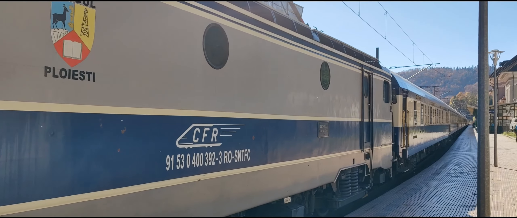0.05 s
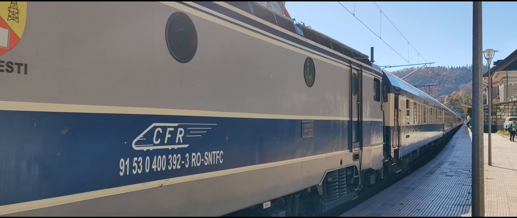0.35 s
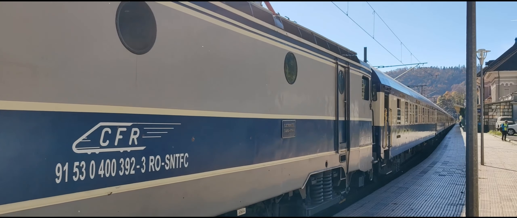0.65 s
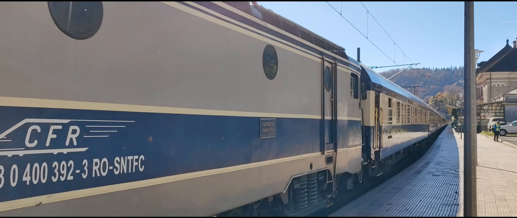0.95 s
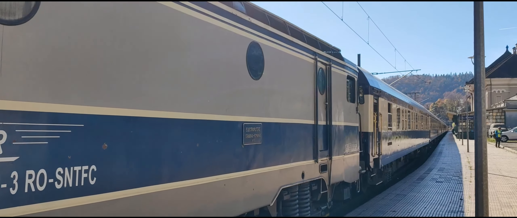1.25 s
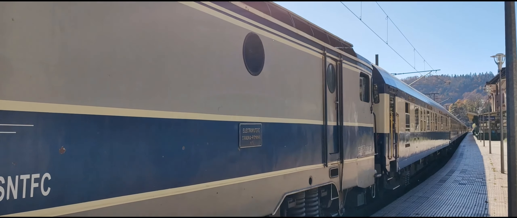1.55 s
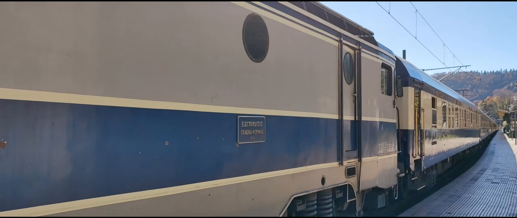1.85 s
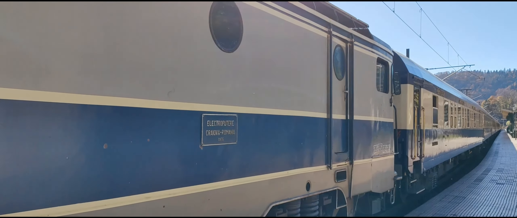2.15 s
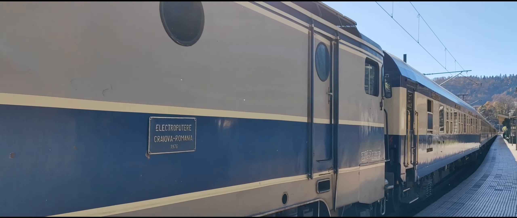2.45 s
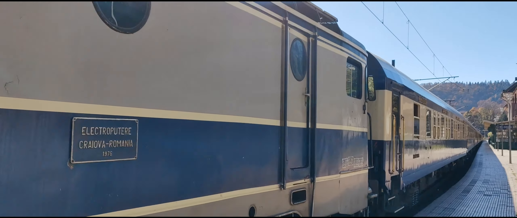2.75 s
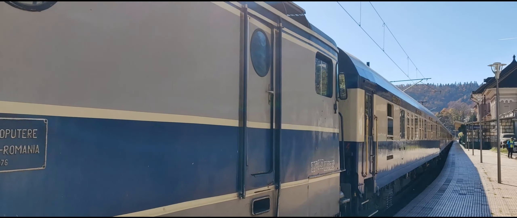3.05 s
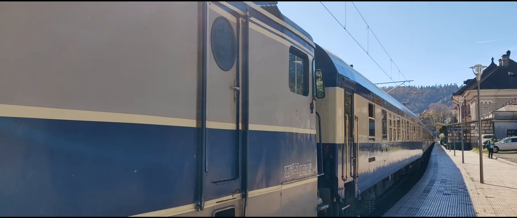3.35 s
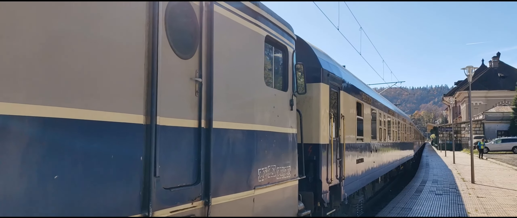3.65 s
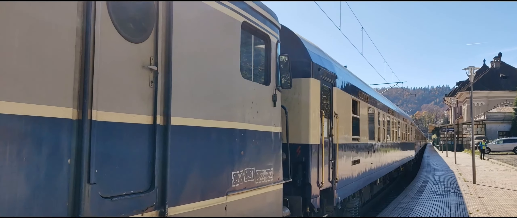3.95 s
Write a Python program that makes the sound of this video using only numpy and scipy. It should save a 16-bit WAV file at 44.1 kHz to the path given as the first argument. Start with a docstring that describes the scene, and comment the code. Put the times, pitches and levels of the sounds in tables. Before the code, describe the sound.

A train passes close by with a humming rush of air that fades into wheel rumble.

```python
"""Cooling blowers boom, hum and rush at close range: an electric locomotive rolls slowly along a station
platform, an arm's length to the left of a spaced pair of microphones. Turbulent air rings its ducts, the
fan blades give the hum, and the rush from the outlets fades and swings ahead as they move off.
That leaves the duller roar of the running gear and coaches, and the hiss of approaching wheels."""
import sys
import numpy as np
from scipy import signal
from scipy.fft import rfft, irfft
from scipy.io import wavfile
from scipy.ndimage import uniform_filter1d

SR = 44100
rng = np.random.default_rng(int(sys.argv[2]) if len(sys.argv) > 2 else 0)


def pcm_store(signal):
    """Save signal as 16-bit PCM."""
    levels = np.round(np.clip(np.atleast_2d(signal), -1, 1) * 32767)
    wavfile.write(sys.argv[1], SR, levels.astype(np.int16).T)


N = 176400
FRAME, HOP = 1024, 256  # samples
TIME = np.arange(N) / SR
FRAME_S, BIN_HZ = np.arange(N // HOP + 5) * HOP / SR, np.fft.rfftfreq(FRAME, 1 / SR)
PADDED_HZ = np.fft.rfftfreq(2 * N, 1 / SR)

# surges of the duct boom (time [s], relative level [dB])
BOOM_LEVEL = [(0, -16.5), (.12, -17.5), (.29, -17), (.39, -17), (.49, -21.5), (.6, -15), (.74, -18.5),
              (.85, -12.5), (.97, -17.5), (1.03, -13), (1.1, -14), (1.2, -14.5), (1.29, -18), (1.45, -16),
              (1.53, -19.5), (1.71, -14.5), (1.77, -18.5), (1.88, -15), (1.96, -21), (2.17, -19),
              (2.32, -26.5), (2.5, -24.5), (2.8, -27), (3.3, -29.5), (4, -30.5)]
# spectrum of the boom (frequency [Hz], relative level [dB])
BOOM_SPECTRUM = [(30, -97), (60, -57.5), (88, -53.5), (102, -42), (135, -38), (164, -27), (188, -40),
                 (240, -50), (295, -40.5), (350, -57.5), (450, -50), (700, -64), (1500, -100), (5000, -160)]
# the ducts pass on the left (time [s], left minus right [dB])
DUCT_BALANCE = [(0, 1), (.6, -0.5), (1.05, 3.5), (1.8, 2.5), (2.35, 4.5), (2.8, 3.5), (3.2, -0.5), (4, 0)]
# blade tone of the blowers (time [s], level [dB])
HUM_LEVEL = [(0, -21), (.4, -21), (.95, -22.5), (1.25, -20), (1.8, -16.5), (2.1, -21), (2.35, -25.5),
             (2.7, -23), (3, -28), (3.2, -27.5), (3.6, -29.5), (4, -28.5)]
# its harmonics (multiple [1], gain [dB])
HUM_HARMONICS = [(1, 1), (2, -24.5), (3, -21.5)]
# air from the outlets, moving off (time [s], gain [dB])
RUSH_FADE = [(0, 2.5), (.5, -0.5), (1, -5.5), (1.5, -9.5), (2, -13), (2.5, -25.5), (4, -60)]
# spectrum of the rush (frequency [Hz], level [dB/Hz])
RUSH_SPECTRUM = [(30, -100.5), (100, -81), (280, -52.5), (400, -56.5), (500, -56.5), (600, -49.5),
                 (800, -53), (1000, -54), (1300, -60), (1500, -66), (1750, -64), (2200, -67), (2650, -66.5),
                 (2950, -70.5), (3700, -72.5), (5500, -77), (8200, -81.5), (10000, -88), (13000, -96),
                 (15000, -103)]
# outlet sound that reaches the microphones directly (frequency [Hz], power share [0-1])
RUSH_DIRECT_SHARE = [(200, 0.51), (500, 0.73), (1100, 0.83), (2500, 0.7), (4000, 0.22), (6000, 0),
                     (9000, 0.1), (14000, 0.2)]
# peaks and troughs that climb as the angle to the outlets changes
# (start [Hz], climb [Hz/s], width [Hz], gain [dB], gone by [s])
RUSH_SWEEPS = [(664, 190, 82, -7.5, 1.26), (750, 120, 58, 3.5, 1.1), (1476, 74, 130, -12.5, 1.4),
               (1494, 460, 220, 7.5, 2.0), (2870, 340, 230, -13, 1.3)]
# resonances of the outlets (frequency [Hz], width [Hz], gain [dB])
OUTLET_MODES = [(1120, 70, 5), (1173, 97, 7), (1258, 100, 4), (1610, 100, 2), (1865, 80, 3.5),
                (1960, 83, 3.5), (2200, 93, 4), (2325, 110, 6), (2476, 80, 9)]
# hollow drone of the nearest outlet (time [s], gain [dB])
DRONE_GAIN = [(0, 3), (.35, -1.5), (.8, 1.5), (1, -2.5), (1.35, -11), (1.47, -14.5), (2.1, -6.5),
              (2.4, -33), (4, -36)]
# spectrum of the drone (frequency [Hz], level [dB/Hz])
DRONE_SPECTRUM = [(100, -115), (200, -70), (250, -67), (275, -42), (303, -41), (340, -50), (450, -81),
                  (1500, -150)]
# roar of the running gear (time [s], gain [dB])
ROAR_GAIN = [(0, 0), (1.5, 0), (2.3, 1.1), (2.7, 1.2), (3.65, 1.2), (4, 0)]
# spectrum of the roar (frequency [Hz], level [dB/Hz])
ROAR_SPECTRUM = [(10, -110), (25, -84), (50, -74.5), (64, -64.5), (76, -50), (86, -56), (100, -50),
                 (135, -58.5), (190, -48), (250, -51), (320, -50.5), (385, -50.5), (450, -54.5),
                 (505, -59.5), (600, -58), (790, -61.5), (890, -62.5), (1300, -65), (1600, -69),
                 (2000, -69), (3000, -81.5), (3900, -82.5), (5000, -88.5), (8000, -96), (10000, -103.5),
                 (12000, -114), (15000, -127)]
# hiss of the approaching wheels (time [s], gain [dB])
HISS_GAIN = [(0, -3), (2.8, -14), (3.3, -5.5), (3.7, -0.5), (4, -0.5)]
# spectrum of the hiss (frequency [Hz], level [dB/Hz])
HISS_SPECTRUM = [(400, -67), (1400, -71.5), (2500, -77), (4000, -89.5), (8000, -93.5), (10000, -102),
                 (13000, -109), (15000, -118)]
# wheel sound that reaches the microphones directly (frequency [Hz], power share [0-1])
WHEEL_DIRECT_SHARE = [(200, 0.38), (500, 0.69), (1100, 0.64), (2500, 0.43), (4000, 0.48), (8000, .08)]
# faint whines of the auxiliary machines (frequency [Hz], relative level [dB])
WHINE_TONES = [(324, -39), (1160, -41), (1330, -45.5), (1631, -36.5)]
# peaks and troughs of the gap between train and platform (frequency [Hz], width [Hz], gain [dB])
GAP_MODES = [(603, 27, 0.5), (768, 43, 2), (1165, 48, 1), (1337, 43, 4.5), (2000, 96, 0), (2070, 74, -1)]
# bearing of the train (time [s], lead of the left microphone in the treble [ms])
LEFT_LEAD = [(0, 0.51), (1, 0.5), (2.3, 0.45), (3, 0.34), (4, 0.33)]
# the low midrange comes from further ahead; bass and treble stay to the left
# (frequency [Hz], share of that lead [0-1])
LEAD_BY_BAND = [(300, 0.93), (450, 0.72), (620, 0.68), (1000, 0.77), (2000, 1)]
# balance between the microphones (frequency [Hz], left minus right [dB])
BAND_BALANCE = [(80, 2.5), (200, 2.5), (280, 5), (360, 1.5), (500, 7.5), (700, 1), (1100, 2.2),
                (1450, -1.5), (2600, -0.5), (4500, .5), (8500, .5), (10500, 2.5), (13000, 1.5)]


def duct_boom(smooth_s=0.06, trim_db=-1.5):
    """Turbulent air rings the low resonance of the ducts in surges, close on the left."""
    boom = station_noise(BOOM_SPECTRUM, gain_db=0, direct=0.28)
    window = int(smooth_s * SR)
    power = uniform_filter1d(uniform_filter1d((boom ** 2).mean(0), window), window)
    surges = amp(trim_db + curve(BOOM_LEVEL, TIME))
    return boom / np.sqrt(power) * surges * pan(curve(DUCT_BALANCE, TIME))


def blower_hum(blade_hz=196.7, doppler_hz=1.7, waver_hz=0.45, flutter_db=1.6, lead_ms=0.13):
    """The blade tone flutters in the air stream and takes a slight Doppler fall as the blowers pass."""
    receding = np.clip((TIME - 1.5) / (2.6 - 1.5), 0, 1)
    cycles = np.cumsum(blade_hz - doppler_hz * receding + waver_hz * wander(7.5)) / SR
    phase = 2 * np.pi * np.array([cycles, cycles - blade_hz * lead_ms / 1000])
    tone = sum(amp(db + flutter_db * wander(18)) * np.sin(round(k) * phase) for k, db in HUM_HARMONICS)
    balance_db = 1.84 * curve(DUCT_BALANCE, TIME)  # swings wider than the boom
    return np.sqrt(2) * tone * amp(curve(HUM_LEVEL, TIME)) * pan(balance_db)


def air_rush(beaming=0.13, sweep_fade_s=0.34, whistle_db=5):
    """Cooling air rushes through resonant outlets; the treble fades first as they move off."""
    t = FRAME_S[:, None]
    fade = curve(RUSH_FADE, t) * (1 + beaming * BIN_HZ / 10000)
    sweeps = sum(db * bell(BIN_HZ, hz + climb * t, width) * np.clip((end - t) / sweep_fade_s, 0, 1)
                 for hz, climb, width, db, end in RUSH_SWEEPS)
    # a second outlet whistles as it passes the microphones
    passing = np.exp(-((t - 1.75) / 0.3) ** 2)
    whistle = whistle_db * bell(BIN_HZ, centre_hz=1330, width_hz=200) * passing
    gain_db = fade + sweeps + whistle + eddies(patch_db=1.8)
    rush = station_noise(RUSH_SPECTRUM, gain_db, across(RUSH_DIRECT_SHARE, BIN_HZ))
    return resonate(rush, OUTLET_MODES)


def outlet_drone():
    """A higher duct resonance, heard while the nearest outlet is close to the microphones."""
    gain_db = curve(DRONE_GAIN, FRAME_S[:, None])
    return station_noise(DRONE_SPECTRUM, gain_db, across(RUSH_DIRECT_SHARE, BIN_HZ))


def running_gear(patch_db=1.7):
    """Wheels on the rails beside the platform: a steady roar, and a hiss that grows as they near."""
    t = FRAME_S[:, None]
    direct = across(WHEEL_DIRECT_SHARE, BIN_HZ)
    roar = station_noise(ROAR_SPECTRUM, curve(ROAR_GAIN, t) + eddies(patch_db), direct)
    hiss = station_noise(HISS_SPECTRUM, curve(HISS_GAIN, t) + eddies(patch_db), direct)
    return roar + hiss


def auxiliary_whines(waver=0.0045, flutter_db=3, fade_ratio=1.6):
    """Thin unsteady tones of the auxiliary machines, far back in the sound, recede with the outlets."""
    whines = np.zeros((2, N))
    lag_s = curve(LEFT_LEAD, TIME) / 1000
    for hz, db in WHINE_TONES:
        cycles = np.cumsum(hz * (1 + waver * wander(20))) / SR
        phase = 2 * np.pi * np.array([cycles, cycles - hz * lag_s])
        whines += amp(db + flutter_db * wander(9)) * np.sin(phase)
    return whines * amp(fade_ratio * curve(RUSH_FADE, TIME))


def station_noise(spectrum, gain_db, direct, spacing_ms=0.61):
    """Noise at the pair: a direct share reaches the left first, the rest is scattered by the station."""
    shape = (3, len(FRAME_S), len(BIN_HZ))
    source, diffuse, separate = rng.standard_normal(shape) + 1j * rng.standard_normal(shape)
    lag_s = across(LEAD_BY_BAND, BIN_HZ) * curve(LEFT_LEAD, FRAME_S[:, None]) / 1000
    straight = np.array([source, source * np.exp(-2j * np.pi * BIN_HZ * lag_s)])
    # scattered sound is alike at both microphones only in the bass
    coherence = np.sinc(2 * BIN_HZ * spacing_ms / 1000)
    scattered = np.array([diffuse, coherence * diffuse + np.sqrt(1 - coherence ** 2) * separate])
    frames = (np.sqrt(direct) * straight + np.sqrt(1 - direct) * scattered) * amp(gain_db)
    noise = signal.istft(frames, nperseg=FRAME, noverlap=FRAME - HOP, time_axis=1, freq_axis=2)[1]
    colour = amp(across(spectrum, np.fft.rfftfreq(noise.shape[1], 1 / SR)))
    return irfft(rfft(noise) * colour)[:, :N] * np.sqrt(1.5 * SR / FRAME)


def eddies(patch_db, flicker_db=0.22, frames=16, bins=4):
    """Turbulence in dB: small random patches of colour and a slight flicker shared by all bands."""
    patches = rng.standard_normal((len(FRAME_S), len(BIN_HZ)))
    patches = uniform_filter1d(uniform_filter1d(patches, frames, axis=0), bins, axis=1)
    return patch_db * patches / patches.std() + flicker_db * wander(30, FRAME_S)[:, None]


def resonate(sound, modes):
    """Colours a sound with narrow, stationary peaks and troughs."""
    peaks_db = sum(db * bell(PADDED_HZ, hz, width) for hz, width, db in modes)
    return equalise(sound, amp(peaks_db))


def equalise(sound, gains):
    """Applies one gain for each frequency of PADDED_HZ."""
    return irfft(rfft(sound, 2 * N) * gains)[:, :N]


def pan(balance_db):
    """Left and right gains for a level difference, at constant power."""
    gains = amp(np.array([balance_db, -balance_db]) / 2)
    return gains / np.sqrt((gains ** 2).mean(0))


def wander(top_hz, t=TIME):
    """Random drift of unit size, spread over the decade below top_hz."""
    hz = top_hz * np.geomspace(0.1, 1, num=20)
    drift = np.sin(2 * np.pi * (hz[:, None] * t + rng.random((len(hz), 1)))).sum(0)
    return drift / np.sqrt(len(hz) / 2)


def bell(hz, centre_hz, width_hz):
    """Bell-shaped peak of height 1."""
    return np.exp(-2 * ((hz - centre_hz) / width_hz) ** 2)


def curve(table, t):
    """A table read at times t."""
    return np.interp(t, *np.transpose(table))


def across(table, hz):
    """A table read on a log-frequency axis."""
    table_hz, values = np.transpose(table)
    return np.interp(np.log(hz + 1), np.log(table_hz), values)


def amp(db):
    """Decibels to gain."""
    return 10 ** (np.asarray(db) / 20)


def scene():
    """The train from the platform edge: the gap colours rush and wheels, and most bands lean left."""
    blowers = blower_hum() + duct_boom()
    through_gap = resonate(air_rush() + running_gear(), GAP_MODES)
    train_side = through_gap + outlet_drone() + auxiliary_whines()
    return blowers + equalise(train_side, pan(across(BAND_BALANCE, PADDED_HZ)))


def record(dry):
    """The recorder's band limit."""
    lowpass = signal.firwin(511, cutoff=15100, window=("kaiser", 9), fs=SR)
    return signal.oaconvolve(dry, lowpass[None], "same")


dry = scene()
out = record(dry)
pcm_store(out)
```